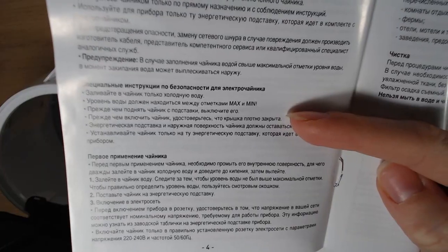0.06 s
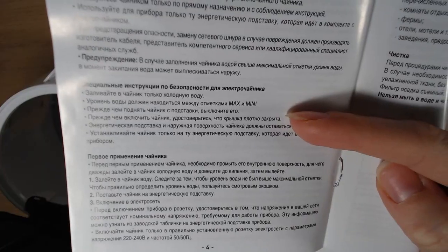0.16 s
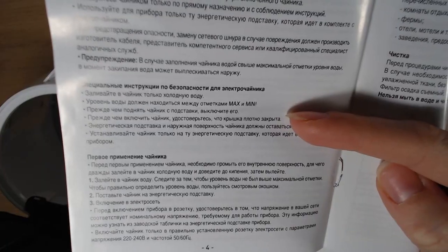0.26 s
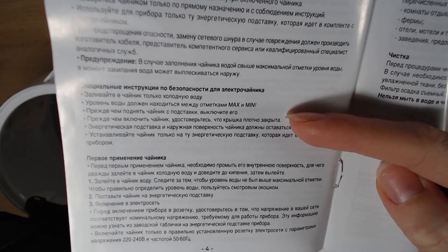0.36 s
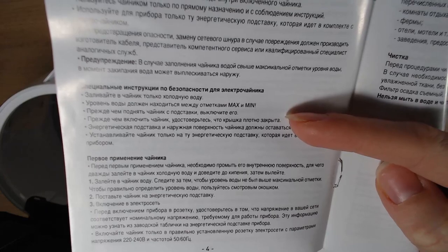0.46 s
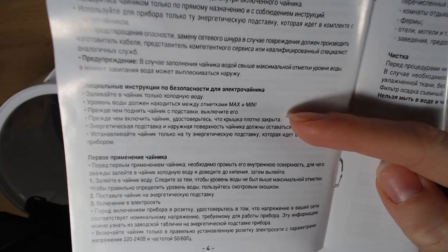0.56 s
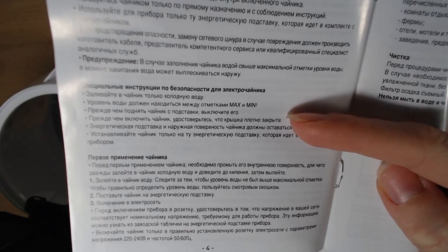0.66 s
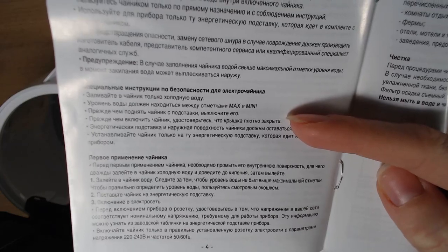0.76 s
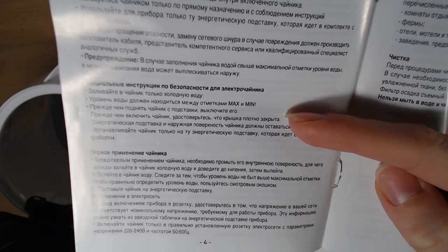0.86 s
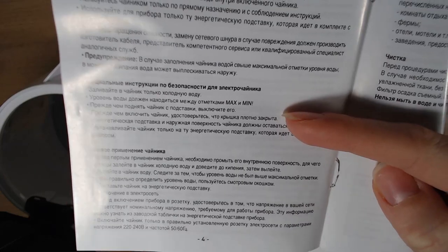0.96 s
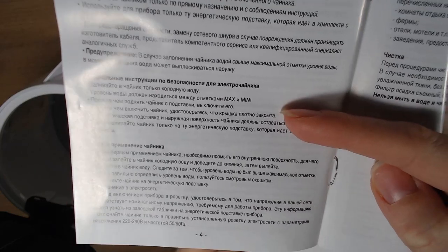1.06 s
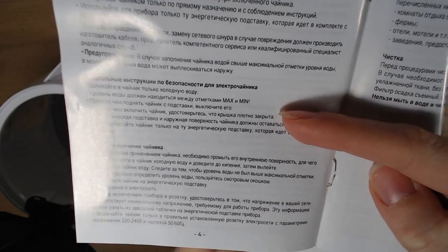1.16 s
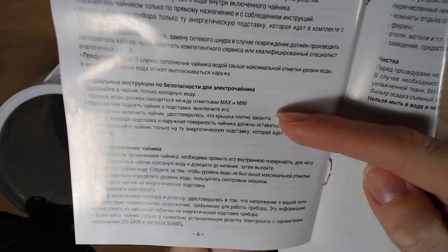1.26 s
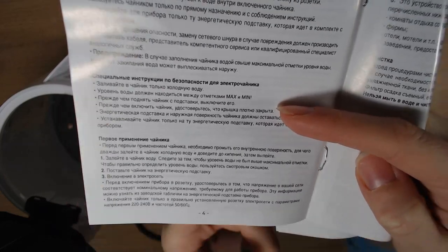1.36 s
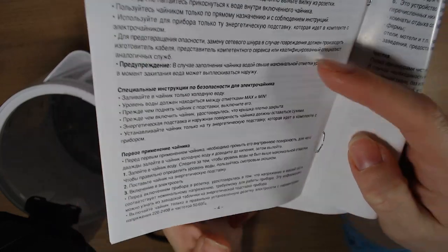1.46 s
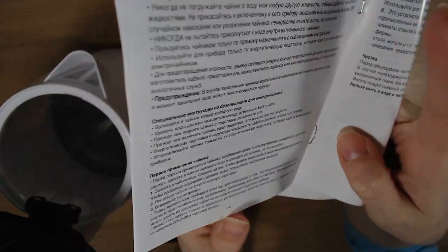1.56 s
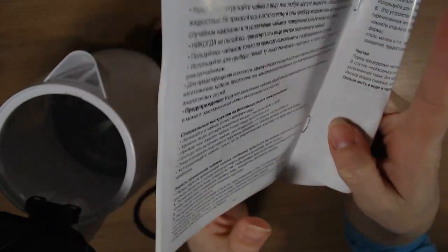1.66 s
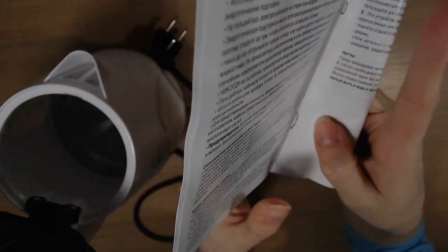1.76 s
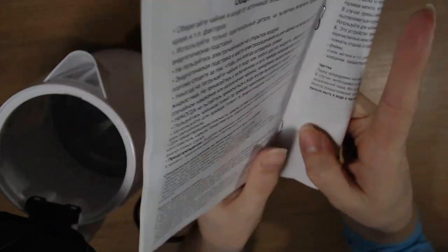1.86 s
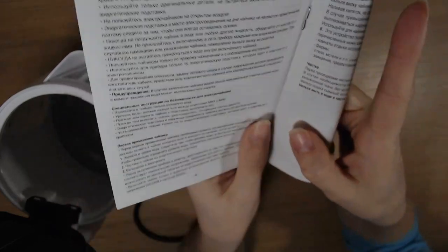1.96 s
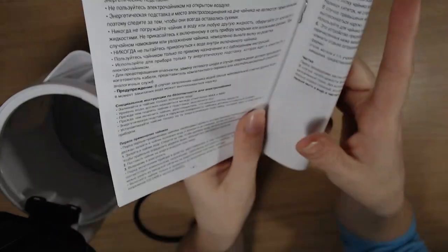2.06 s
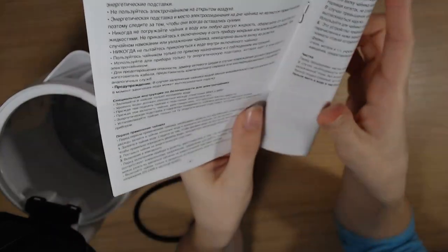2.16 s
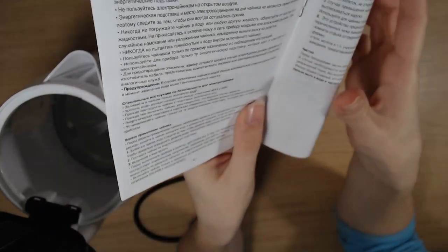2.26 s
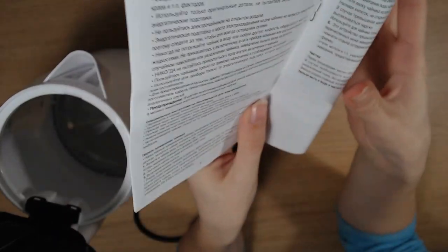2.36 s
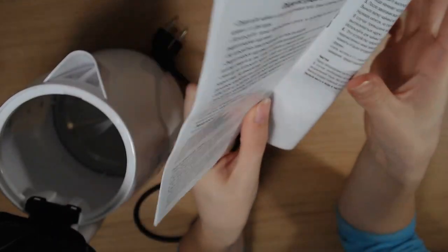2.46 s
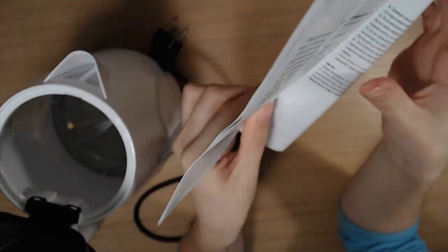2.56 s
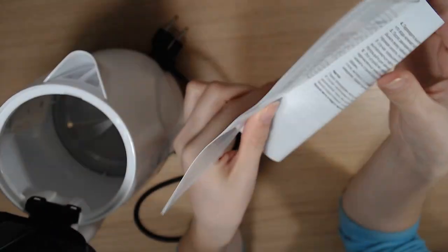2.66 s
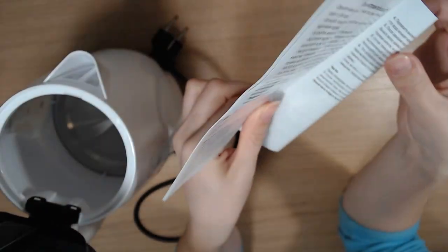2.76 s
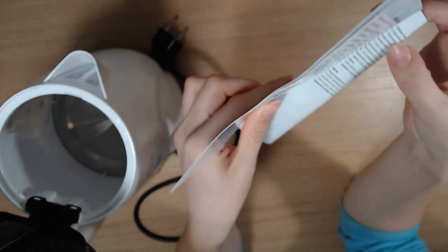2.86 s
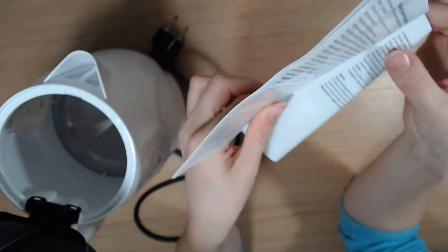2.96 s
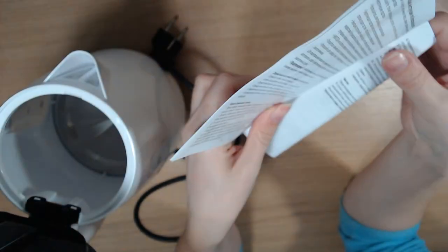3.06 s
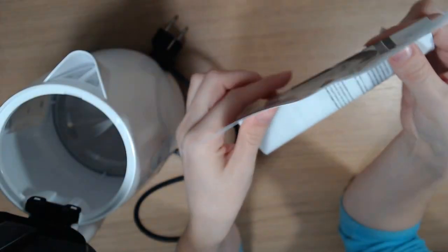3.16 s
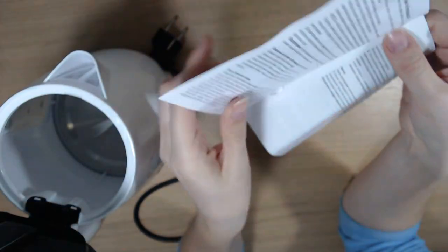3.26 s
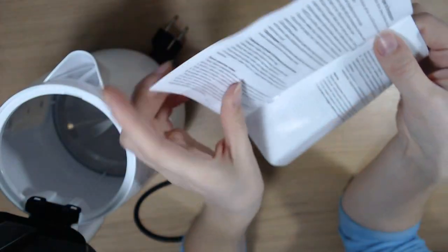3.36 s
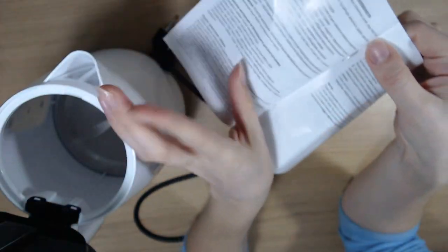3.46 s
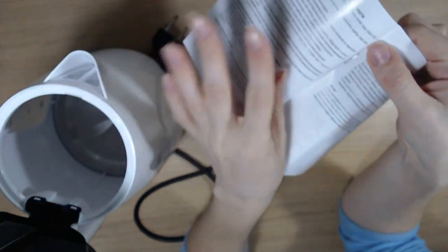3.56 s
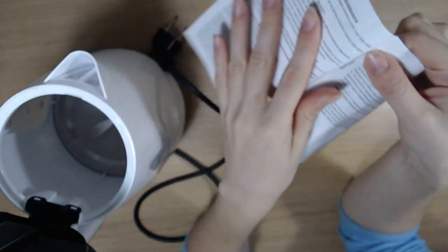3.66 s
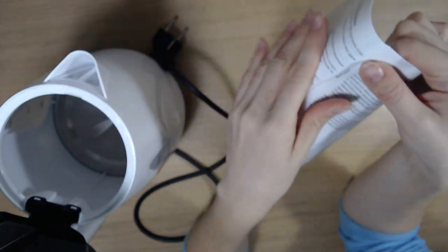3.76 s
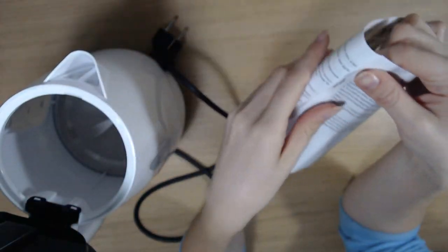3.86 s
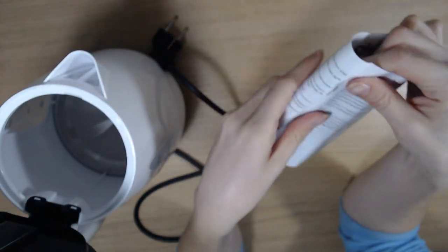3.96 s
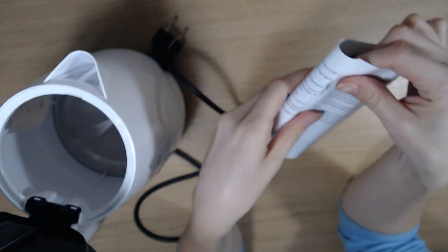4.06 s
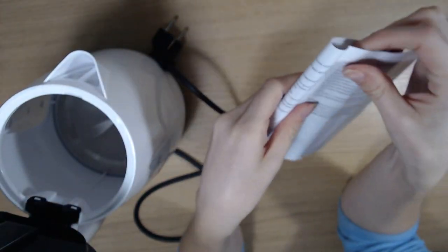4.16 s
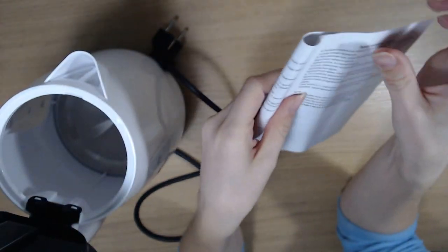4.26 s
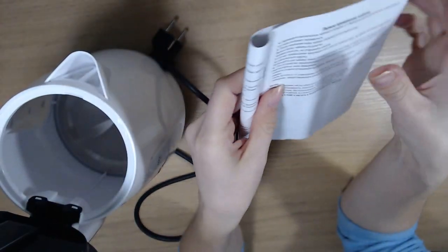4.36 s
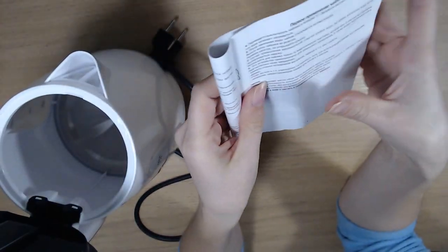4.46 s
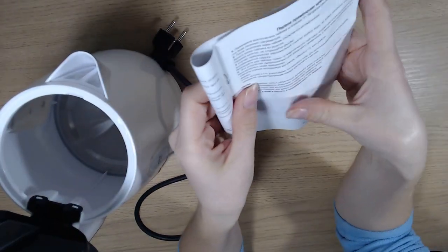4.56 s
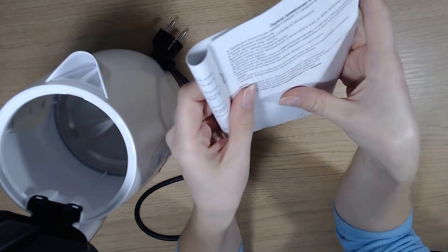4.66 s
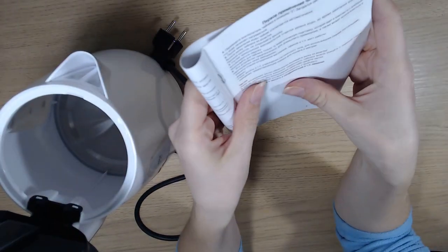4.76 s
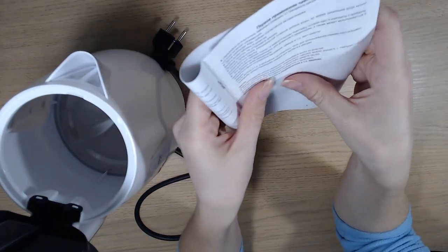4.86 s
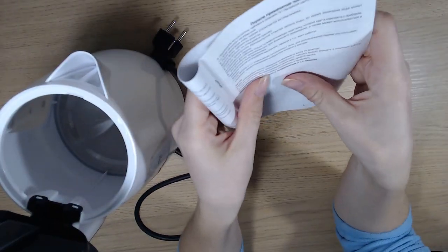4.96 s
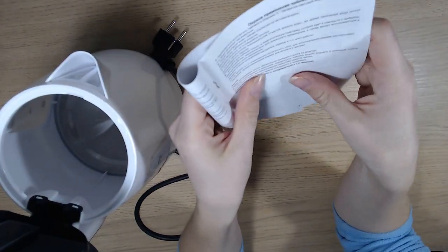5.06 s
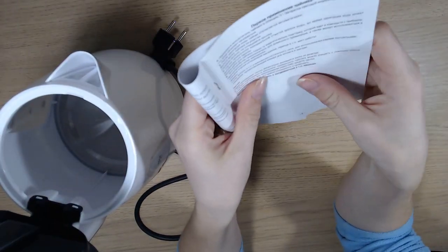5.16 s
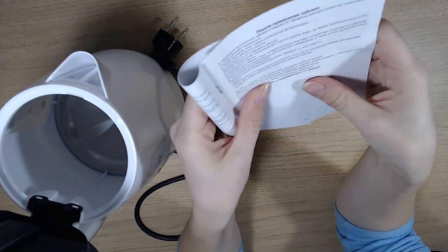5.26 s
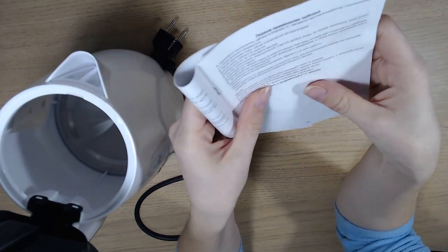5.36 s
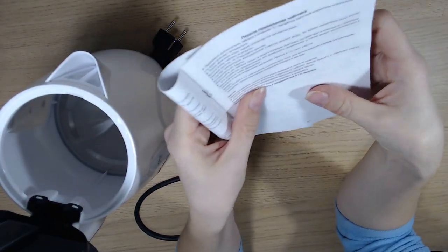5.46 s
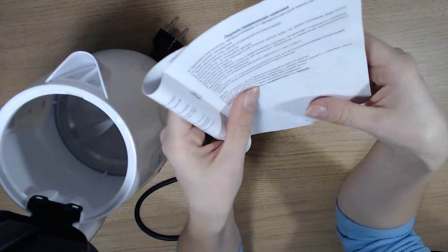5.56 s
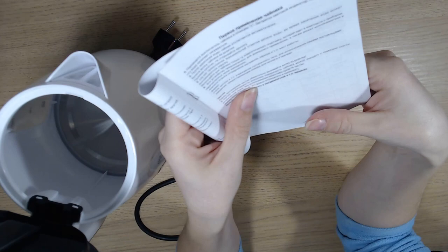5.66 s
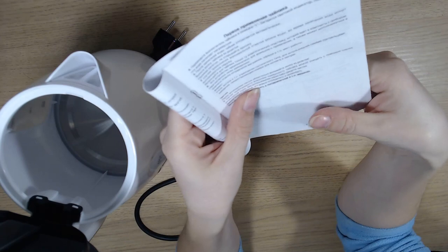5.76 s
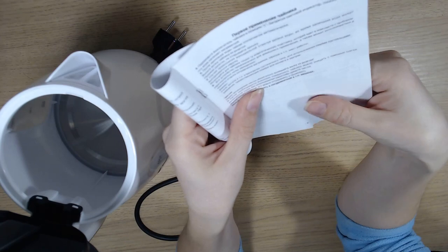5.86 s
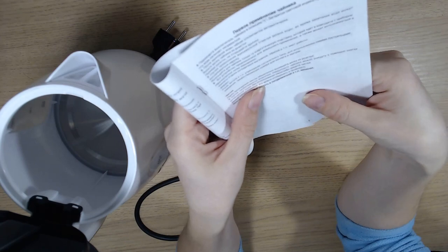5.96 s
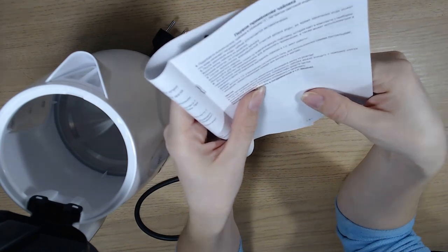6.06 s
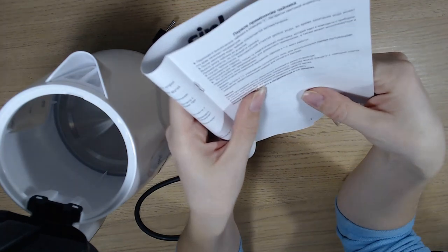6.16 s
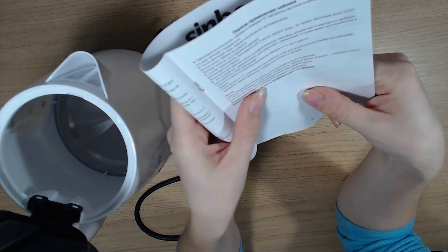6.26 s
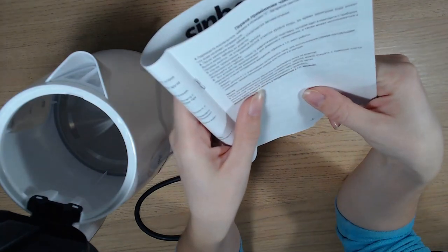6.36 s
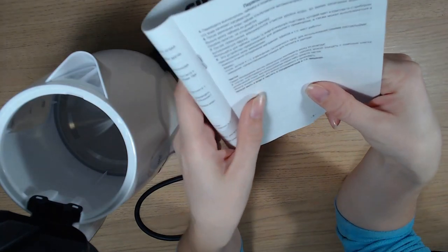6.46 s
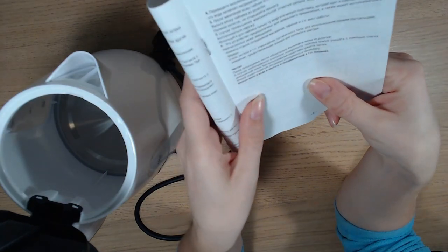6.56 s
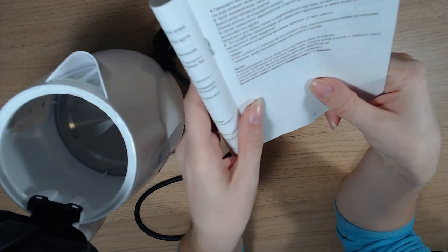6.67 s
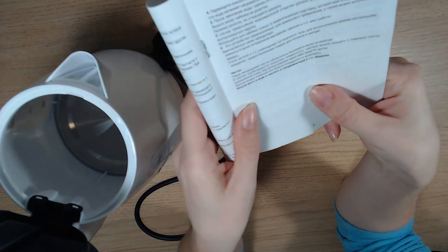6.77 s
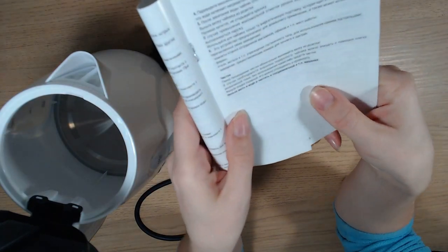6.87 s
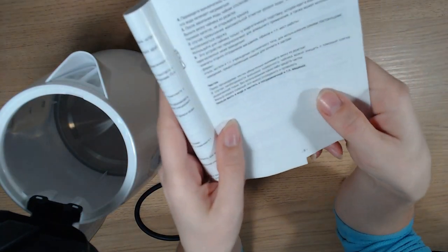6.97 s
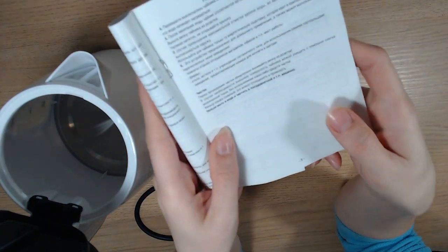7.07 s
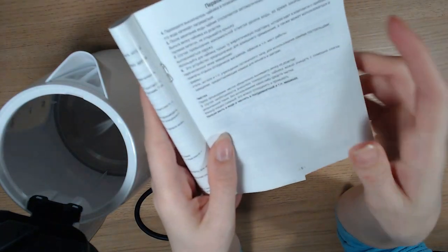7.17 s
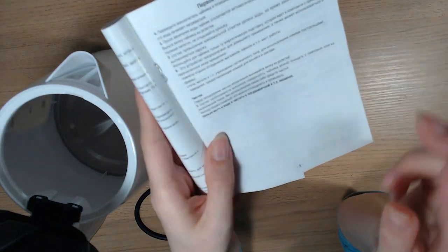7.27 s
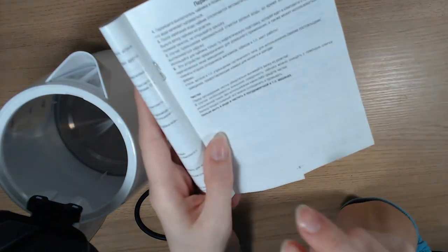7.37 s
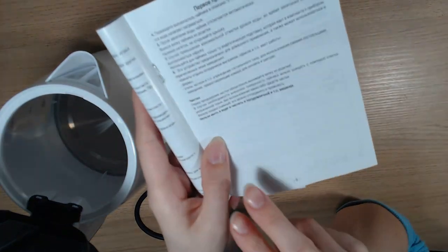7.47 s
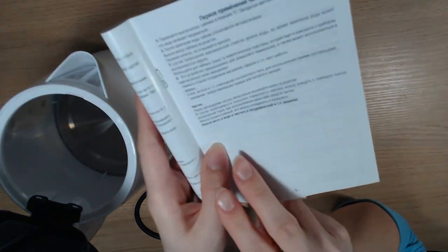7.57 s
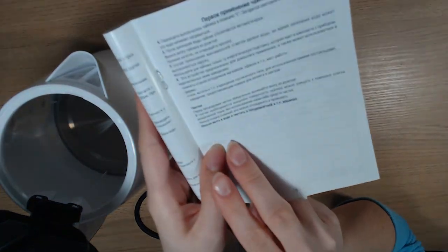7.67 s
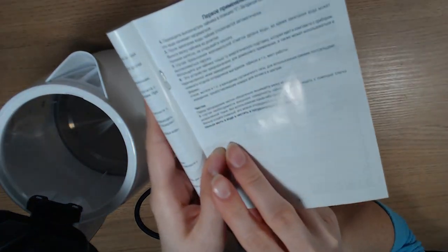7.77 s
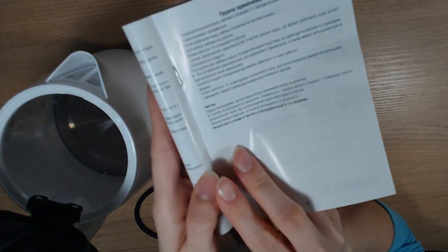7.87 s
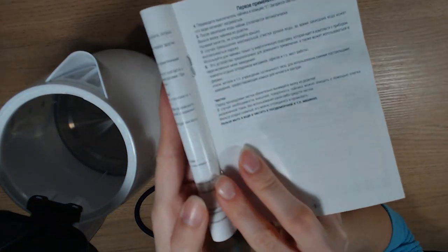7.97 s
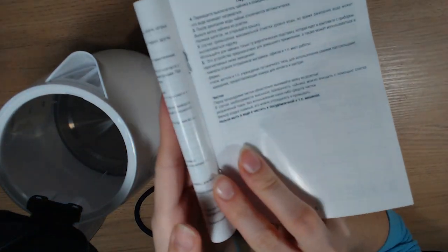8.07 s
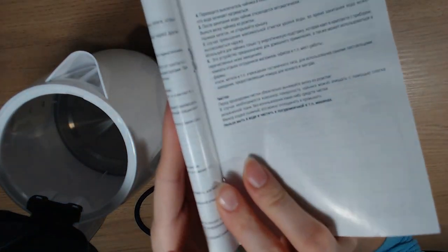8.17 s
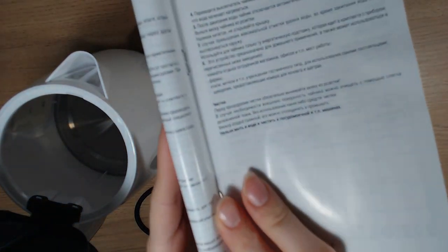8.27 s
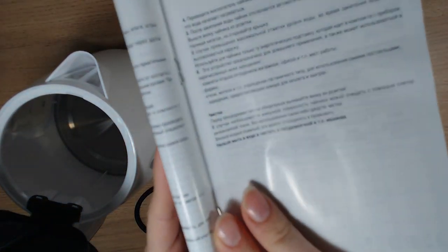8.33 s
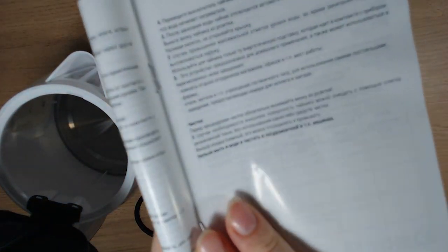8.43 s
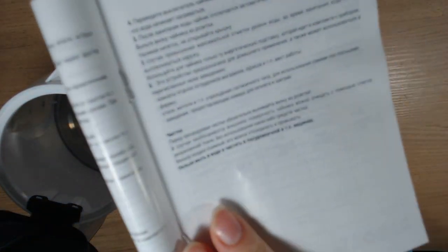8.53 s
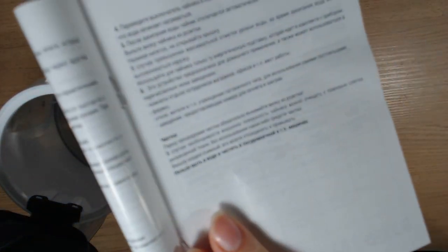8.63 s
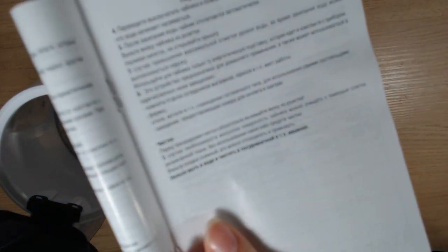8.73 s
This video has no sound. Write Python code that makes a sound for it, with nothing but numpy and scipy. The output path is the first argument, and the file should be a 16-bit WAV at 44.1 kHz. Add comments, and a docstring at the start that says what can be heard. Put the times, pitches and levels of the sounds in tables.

```python
"""Stiff paper booklet over a desk

A booklet is opened, folded back and smoothed flat close to a small stereo microphone. Its sheets slide
and creep as filtered fibre clicks, and snap, crinkle and rub as noise bursts and grains through resonances.
Fingertip ticks are short noise bursts; one squeak and the air puffs are decaying or swelling tones.
Desk, open kettle and small room answer; noise rumble, mains hum and a thin whine lie underneath."""
import sys
import numpy as np
from scipy import signal
from scipy.fft import rfft, irfft
from scipy.io import wavfile
from scipy.ndimage import uniform_filter1d

SR = 44100
rng = np.random.default_rng(int(sys.argv[2]) if len(sys.argv) > 2 else 0)


def master_out(mix):
    """Clip the mix to full scale and print it as 16-bit PCM to the path in sys.argv[1]."""
    frames = np.transpose(np.atleast_2d(mix))
    ceiling = np.clip(frames, -1, 1)
    pcm = np.round(ceiling * 32767).astype(np.int16)
    wavfile.write(sys.argv[1], SR, pcm)


N = 388080
TIME = np.arange(N) / SR
FREQ = np.arange(N // 2 + 1) * SR / N

# body, crack and edge ranges of the paper: low_hz, high_hz
PAPER_RANGES = [(140, 650), (650, 2800), (2800, 8000)]
BODY_HZ, CRACK_HZ, EDGE_HZ = PAPER_RANGES


def undb(db):
    """Decibels to gain."""
    return 10 ** (np.asarray(db) / 20)


def unit(x):
    """Scale to rms 1."""
    return x / np.sqrt(np.mean(x ** 2) + 1e-18)


def band(x, edges_hz, order=3):
    """Causal band-pass."""
    return signal.sosfilt(signal.butter(order, edges_hz, "band", fs=SR, output="sos"), x)


def ring(x, hz, q):
    """One resonance, gain 1 at its centre."""
    return signal.lfilter(*signal.iirpeak(hz, max(q, 1), fs=SR), x)


def over_freq(points):
    """Join (Hz, value) points on a log frequency axis."""
    hz, value = np.transpose(points)
    return np.interp(np.log(FREQ + 1), np.log(hz), value)


def shape(x, db):
    """Causal minimum-phase filter with the given gain per frequency."""
    cepstrum = irfft(np.log(undb(db)), N)
    cepstrum[1:N // 2] *= 2
    cepstrum[N // 2 + 1:] = 0
    return irfft(rfft(x) * np.exp(rfft(cepstrum)), N)


def walk(rate):
    """Smooth random motion of rms 1, with a new target `rate` times a second."""
    hold = max(int(SR / rate), 1)
    steps = np.repeat(rng.standard_normal(N // hold + 1), hold)
    return unit(uniform_filter1d(steps, hold)[:N])


def pan(db):
    """Left and right gains for a left-minus-right level difference."""
    gains = undb(np.array([[db], [-db]]) / 2)
    return unit(gains)


def pair(mid, side, spread):
    """Two channels that differ by a share of side."""
    return (mid + spread * side * np.array([[1], [-1]])) / np.sqrt(1 + spread ** 2)


def add(out, s, sound):
    """Mix a sound in at a time in seconds."""
    i = int(s * SR)
    out[:, i:i + sound.shape[-1]] += sound[..., :N - i]


def grains(rate, scatter_db):
    """Fibres catching and letting go: random clicks, a few much larger than the rest."""
    size = undb(scatter_db * np.minimum(rng.exponential(size=N), 5))
    clicks = rng.random(N) < rate / SR
    return unit(clicks * size * rng.standard_normal(N))


# spectrum of the room air: pitch_hz, relative_level_db_per_hz
AIR_SPECTRUM = [(20, -11), (50, -5.5), (80, -13), (125, -5.5), (170, -9.5), (230, -12), (470, -16),
                (650, -15), (850, -19), (1000, -23.5), (1500, -24.5), (2400, -33), (8000, -40)]
# likeness of left and right in the air: pitch_hz, likeness_0_to_1
AIR_LIKENESS = [(60, 0.5), (300, 0.76), (1000, 0.7), (2000, 0.2), (4000, 0), (8000, 0.3)]
# mains and motor hum: pitch_hz, middle_level_db_rms, waver_db
HUM_TONES = [(49.8, -56.5, -5), (121.8, -53, 3), (165.7, -54, 2.5)]
# thin whine: pitch_hz, middle_level_db_rms
WHINE_TONES = [(1600, -62.5), (1799, -75)]
AIR_DB, WHINE_END_S = -49, 4.72


def background(waver_db=2.0):
    """Shaped noise makes rumble and hiss; wavering sines make the hum and a whine that stops about halfway."""
    likeness = np.clip(over_freq(AIR_LIKENESS), 0, 1)
    mid, side = rfft(rng.standard_normal((2, N))) * undb(over_freq(AIR_SPECTRUM))
    air = unit(irfft(pair(mid * np.sqrt(1 + likeness), side * np.sqrt(1 - likeness), 1.0), N))
    air = undb(AIR_DB + .5 * walk(11)) * air * pan(-1.7)
    hum, whine = np.zeros(N), np.zeros(N)
    for hz, db, depth_db in HUM_TONES:
        level = undb(db + depth_db * np.tanh(walk(2.7)))
        hum += level * np.sin(2 * np.pi * hz * TIME + 0.45 * walk(5))
    for hz, db in WHINE_TONES:
        whine += undb(db + waver_db * walk(15)) * np.sin(2 * np.pi * hz * TIME)
    whine = whine * np.clip((WHINE_END_S - TIME) * 20, 0, 1)
    # the root of two turns sine peaks into rms levels
    return air + np.sqrt(2) * (hum * pan(-4.0) + whine * pan(-8.5))


# every push gathers speed, eases off as it goes and dies away when the hand stops
SLIDE_ATTACK_S, SLIDE_SAG_DB, SLIDE_RELEASE_S = 0.015, -1.5, 0.019


def push(start, length):
    """Speed of one sliding movement: attack, sagging hold, release."""
    age = TIME - start
    attack = np.clip(age / SLIDE_ATTACK_S, 0, 1)
    hold = undb(SLIDE_SAG_DB * np.clip(age / length, 0, 1))
    release = np.exp(-np.clip((age - length) / SLIDE_RELEASE_S, 0, 20))
    return attack * hold * release


# pushes of paper over paper or skin, levels before colouring:
# start_s, length_s, rub_db, flutter_re_rub_db, hiss_re_rub_db
PUSHES = [(0.8, 0.13, -59.5, -14, 4), (1.466, 0.072, -59.5, 4, -2), (1.661, 0.042, -53.5, -3, 13),
          (1.751, 0.025, -50.5, 11.5, -14), (1.93, 0.15, -56, 1, 9.5), (2.07, 0.05, -48, 3, -2),
          (2.174, 0.21, -54.5, 0, 8), (2.416, 0.028, -47.5, 7.5, 12.5), (2.652, 0.11, -61, 1, 10),
          (2.857, 0.05, -49.5, 4, 9), (3.17, 0.15, -45, 1.5, 7.5), (3.36, .15, -43.5, -3, 6.5),
          (3.665, 0.042, -43.5, 5.5, 9), (3.75, 0.07, -48, -0.5, -2), (3.9, 0.12, -52.5, -3, 3),
          (4.144, 0.08, -48, -11, 12.5), (4.276, 0.07, -47, 0, 11), (4.621, 0.052, -48.5, -2, 3),
          (4.744, 0.42, -64, 10, 16), (5.112, 0.12, -48, -8, 10), (5.318, 0.046, -56, -2, -5),
          (5.403, 0.023, -50.5, 6, -3), (6.048, 0.29, -66, -18, 17), (6.504, 0.079, -56, -3, 12.5),
          (6.847, 0.39, -49, -4.5, 4), (7.523, 0.1, -44.5, -13, -6), (7.765, 0.25, -48.5, -16, 4),
          (8.034, 0.045, -48.5, -14, 6.5), (8.19, 0.1, -49.5, -5, 4), (8.303, 0.19, -46, -5, 1),
          (8.471, 0.069, -40.5, -8.5, 1.5), (8.553, 0.089, -48, 1.5, 2.5), (8.675, 0.063, -51.5, 3.5, 1)]
# creep under the grip, more while the sheets are worked hard: time_s, base_level_db
GRIP_CREEP = [(0.8, -67), (1.35, -62.5), (2.2, -63.5), (2.55, -63.5), (3.08, -58), (3.3, -56),
              (3.62, -58.5), (4.1, -47), (4.52, -62.5), (5.05, -61), (5.62, -65.5), (6.2, -56.5),
              (6.75, -57), (7.05, -51.5), (7.3, -59.5), (7.9, -50), (8.6, -58.5), (8.8, -67)]
# rub, flutter and hiss of the creep, in dB on its base level
CREEP_RUB_DB, CREEP_FLUTTER_DB, CREEP_HISS_DB = -2.5, -6, 3.5
HANDS_S = 0.8  # the hands begin to move


def friction_gains():
    """Gains of rub, flutter and hiss: the pushes add their power to the creep under the grip."""
    creep = undb(np.interp(TIME, *np.transpose(GRIP_CREEP)))
    creep = creep * np.clip((TIME - HANDS_S) * 10, 0, 1)
    speeds, levels = [creep], [(CREEP_RUB_DB, CREEP_FLUTTER_DB, CREEP_HISS_DB)]
    for start, length, rub_db, flutter_db, hiss_db in PUSHES:
        speeds.append(push(start, length))
        levels.append((rub_db, rub_db + flutter_db, rub_db + hiss_db))
    return np.sqrt(undb(levels).T ** 2 @ np.array(speeds) ** 2)


# colour of sliding paper: pitch_hz, gain_db
SLIDING_COLOUR = [(100, -4), (300, 1), (700, -2), (1200, -5), (1900, 3), (2800, -2), (4500, -3.5),
                  (6500, -6.5), (8000, -17)]


def sliding(rub_gain, flutter_gain, hiss_gain, gain_db=-2, catch_db=1.5, pan_db=-2):
    """Dense fibre clicks that catch and ease as the sheets move; the hiss spreads from the whole page."""
    fibres, catch = grains(7000, 1.5), catch_db * walk(70)
    flutter = unit(band(grains(1500, 2.0), BODY_HZ))
    rub = pair(unit(band(fibres, CRACK_HZ)), unit(band(grains(7000, 2.5), CRACK_HZ)), 0.21)
    hiss = pair(unit(band(fibres, EDGE_HZ)), unit(band(grains(6200, 2.3), EDGE_HZ)), 0.74)
    sound = flutter_gain * flutter + rub_gain * rub + hiss_gain * hiss
    sound = sound * undb(catch + gain_db)
    return shape(sound, over_freq(SLIDING_COLOUR)) * pan(pan_db)


# a fingertip sticks on the glossy page and lets go with a tick: start_s, level_db, centre_hz
TICKS = [(0.939, -50, 2700), (1.032, -56.5, 2000), (1.1163, -55.5, 2100), (1.4957, -48, 1700),
         (7.356, -55, 2200), (7.374, -52.5, 2200), (7.3875, -53.5, 2100), (7.4694, -47, 3300),
         (7.48, -47, 3200), (7.4925, -48, 2500), (7.545, -48.5, 2200), (7.555, -52, 2300),
         (7.574, -56, 2500), (7.6003, -47, 2200), (7.613, -46, 1900), (7.6217, -49.5, 2300),
         (8.6522, -49.5, 1900), (8.699, -46, 1700), (8.7175, -49.5, 1700), (8.7335, -42, 1650),
         (8.744, -50.5, 1900)]
SQUEAK_S, SQUEAK_DB, SQUEAK_HZ, SQUEAK_MS = 4.6992, -25.5, 1635, 8


def fingertip(slip_s=0.0008, slip_width=1.34, size=512):
    """Skin sticks and slips on the gloss: slowly as single ticks, fast as one short rough squeak."""
    out, t = np.zeros((2, N)), np.arange(size) / SR
    for s, db, hz in TICKS:
        burst = rng.standard_normal(size) * np.exp(-t / slip_s)
        tick = unit(band(burst, (hz / slip_width ** 2, hz * slip_width), order=2))
        add(out, s, tick * undb(db) * pan(-1.0))
    swell = np.sin(np.pi * np.minimum(1000 * t / SQUEAK_MS, 1))
    grit = .35 * unit(band(rng.standard_normal(size), (1000, 3000), order=2))
    squeak = swell * (np.sin(2 * np.pi * SQUEAK_HZ * t) + grit)
    add(out, SQUEAK_S, undb(SQUEAK_DB) * squeak * pan(-7.5))
    return out


# the sheets are under strain: from_s, to_s
STRAIN_S = (1.4, 5.5)


def crinkle(rub_gain, rate=40, q=6, count=6, size=256):
    """Tiny creases give way while the sheets are bent; each small facet has its own pitch."""
    strain = rub_gain * (TIME > STRAIN_S[0]) * (TIME < STRAIN_S[1])
    # a crease runs for about a millisecond
    fade, out = np.exp(-TIME[:size] / .0012), 0
    for hz in np.geomspace(1100, 4500, count):
        creases = signal.fftconvolve(grains(rate, 1.4), rng.standard_normal(size) * fade)[:N]
        facets = creases + 2 * ring(creases, hz, q)
        out = out + unit(band(facets, (600, 5000), order=2))
    return unit(out) * strain * pan(-4.5)


# fingers smooth the fold: middle_s, level_db, page_resonance_hz, half_length_s, resonance_q
FOLD_STROKES = [(1.528, -54.5, 1890, 0.024, 3.6), (7.575, -49, 2290, 0.019, 2.5),
                (7.677, -40, 2800, .007, 2), (7.917, -44.5, 2150, 0.042, 1.3),
                (8.163, -51.5, 1700, 0.05, 9.4), (8.365, -50, 1950, 0.022, 3.8),
                (8.414, -42.5, 1750, 0.011, 8.4), (8.509, -44, 1650, 0.013, 3),
                (8.555, -53.5, 1730, 0.11, 4.3)]


def smoothing(catch_db=2, rate=2000, scatter_db=2):
    """Fingers drag along the fold; the pressed page rings under their grainy friction."""
    friction = band(grains(rate, scatter_db), (1250, 5000), order=2) * undb(catch_db * walk(90))
    out = 0
    for s, db, hz, half_s, page_q in FOLD_STROKES:
        page = unit(ring(friction, hz, page_q))
        swell = np.exp(-.5 * ((TIME - s) / half_s) ** 2)
        out = out + undb(db) * swell * page
    return out * pan(-1.6)


# a sheet buckles, levels before colouring:
# start_s, crack_db, body_re_crack_db, edge_re_crack_db, facet_hz, length_ms, left_minus_right_db
BUCKLES = [(1.768, -42.5, 0, 5, 2240, 2.9, -9.5), (1.7717, -34, -4, 5.5, 2260, 3, -8.5),
           (2.0696, -43, 4.5, 7.5, 2580, 4, 1), (2.0976, -37, 6.5, -28, 1130, 1.1, -3),
           (2.1184, -30, -1, -17, 2040, 3.3, -2), (2.133, -36.5, -21, -4.5, 2150, 2, 0.5),
           (2.28, -46.5, 5.5, 5, 2260, 2, -3), (3.158, -39, -0.5, 20, 4530, 2.54, -0.5),
           (3.2112, -35, 0, 15, 4280, 2.3, 3), (3.2702, -28.5, -3.5, -5, 900, 1.3, -3),
           (3.325, -40.5, 2, -13, 1420, 3.4, -2), (3.362, -36, -1.5, 8, 6240, 6.7, -2),
           (3.4033, -35, 0.5, -17, 1410, 2.4, -4.5), (3.4062, -27.5, -7, -14, 2180, 3.9, -3),
           (3.522, -43, -4, 6.5, 3100, 2.5, -4), (3.5345, -33.5, -1, 1, 2350, 5.3, -3.5),
           (3.6147, -40.5, -3.5, 6, 2530, 3, -3.5), (3.6785, -40.5, -1.5, -2.5, 1460, 3.7, -5),
           (3.7521, -33.5, 1.5, 2.5, 1230, 3, -3), (3.771, -32, -3, 2.5, 4060, 1.6, -3),
           (4.0551, -24, -6.5, -6, 780, 2.2, -2), (4.1451, -25, -4.5, -2.5, 2950, 3.1, -3.5),
           (4.1498, -33, -4.5, -2, 1330, 1.6, -4), (4.165, -42, -7, -2, 3300, 1.8, 1),
           (4.1989, -32.5, -4.5, -8.5, 1570, 3.4, -3), (4.3073, -30, -2, 3.5, 2370, 2.9, -3),
           (4.326, -42, 1, 2, 2310, 1.5, -2), (4.7535, -49, 2.5, -0.5, 2780, 1.3, -6),
           (4.92, -42, -1, -1, 1320, 3.1, -3.5), (4.9575, -28.5, -2, -6.5, 2130, 2.7, -3),
           (4.9639, -33, -3.5, -3, 3150, 2.7, -5), (5.078, -38, 1.5, -22, 1390, 1.8, -3),
           (5.1036, -27.5, -12.5, -0.5, 1310, 1.35, -4), (5.1129, -26.5, -8, 5, 1470, 1.35, -4),
           (5.1279, -35.5, -1.5, -3, 1330, 4.2, -3), (5.1489, -31, -6, 0, 3100, 0.91, -4),
           (5.216, -38.5, -4, 8.5, 6470, 5.4, 0), (5.2232, -28.5, -5.5, -2, 2440, 2.8, -3.5),
           (5.34, -49.5, -5, -3, 2400, 2.6, -2), (5.3939, -49.5, 11, -10, 1150, 4, -2),
           (5.429, -47.5, -2, -2.5, 1900, 3.5, -3), (6.124, -31.5, -11.5, -7.5, 2480, 2.2, -2.5),
           (7.1539, -42.5, 1.5, -5.5, 1590, 1.6, -1.5), (7.2106, -45, -4.5, -7, 935, 2.7, -4),
           (8.0753, -31.5, -15, -5.5, 1740, 2.5, -1), (8.2623, -50, 4.5, -17, 890, 1.9, -0.5)]


def snaps(body_stretch=3.6, edge_spread=0.086, ring_gain=1.0, ring_q=6.0, build_up=0.42, body_width=1.576,
          settle_db=-14, settle_ms=17, settle_rate=330, dull_hz_per_db=220, size=4096):
    """Creases gather, the buckle kicks and runs on, then small creases settle; the body outlasts the edge."""
    lead = size // 8
    out, ms = np.zeros((2, N)), 1000 * (np.arange(size) - lead) / SR
    span = np.sqrt(.01 * SR)  # levels count over a hundredth of a second
    for s, db, body_db, edge_db, facet_hz, length_ms, pan_db in BUCKLES:
        creases = rng.standard_normal((4, size)) * undb(2 * rng.standard_normal((4, size)))
        # the kick as the buckle lets go
        creases[:, lead] = 1.5 * np.sqrt(SR / 1000) * rng.choice([-1, 1]) / max(length_ms, 1)
        age = np.abs(ms) / max(length_ms, .5)
        # a slow buckle is heard coming, a quick one is not
        gather = np.clip(build_up * (length_ms - 2), 0, .5) * np.exp(-age)
        # a heavy buckle moves more of the sheet and sounds lower
        body_hz = 350 * 2 ** (-np.clip(body_db, -10, 3) / 22)
        body = creases[0] * np.where(ms < 0, gather / 2, np.exp(-age / body_stretch))
        body = band(body, (body_hz / body_width, body_hz * body_width), order=2)
        burst = creases[1:] * np.where(ms < 0, gather, np.exp(-(age / 1.38) ** 1.5))
        # a long buckle leaves a stronger ragged trail of ticks
        ticks = (rng.random(size) < settle_rate / SR) * (ms > 2 * length_ms)
        trail = creases[1:] * ticks * np.exp(-np.abs(ms) / settle_ms)
        trail_gain = undb(settle_db) * min(length_ms / 3.1, 1) ** 2
        burst = unit(burst) + trail_gain * unit(trail)
        # the facet that flips over rings at a pitch set by its size
        burst = burst + ring_gain * ring(burst, facet_hz, ring_q)
        crack = band(burst[0], CRACK_HZ)
        # a weak edge is also a dull one
        top_hz = np.clip(7003 + dull_hz_per_db * edge_db, 5000, EDGE_HZ[1])
        edge = pair(*band(burst[1:], (EDGE_HZ[0], top_hz)), edge_spread)
        snap = undb(body_db) * unit(body) + unit(crack) + undb(edge_db) * unit(edge)
        add(out, s - lead / SR, snap * span / np.sqrt(size) * undb(db) * pan(pan_db))
    colour = [(150, 8.0), (400, 0.0), (1500, 2.0), (4000, 1.5), (6500, -1.0), (8000, -9)]
    return shape(out, over_freq(colour))


# a page or palm pushes air: start_s, starting_level_db, starting_pitch_hz, decay_ms
AIR_PUFFS = [(1.778, -26, 183, 7.8), (2.117, -24, 210, 5.9), (2.281, -37.5, 79.5, 27),
             (2.425, -30, 170, 22), (3.397, -24, 290, 5), (3.54, -26, 240, 10), (3.7514, -14, 114, 4.8),
             (3.7598, -23, 213, 6.3), (4.148, -16.5, 305, 9), (8.075, -25, 124, 5.5), (8.63, -34, 110, 8.5)]


def puffs(sag=0.12, size=8192):
    """A flapping page swings a few times, slower as it goes slack."""
    out, t = np.zeros((2, N)), np.arange(size) / SR
    for s, db, hz, decay_ms in AIR_PUFFS:
        fade = np.exp(-1000 * t / decay_ms)
        phase = 2 * np.pi * np.cumsum(hz * (1 - sag * (1 - fade))) / SR
        add(out, s, -undb(db) * fade * np.sin(phase) * pan(-3.5))
    return out


# resonances of the held booklet above the desk: centre_hz, width_hz, boost_db
BOOKLET_MODES = [(305, 153, 4.5), (401, 44, 7), (826, 130, 3), (900, 63, 1), (1360, 420, 3.5),
                 (1670, 190, 0), (2260, 270, 0), (2750, 100, 0), (3220, 250, 2.5), (4070, 300, 1.5),
                 (6950, 500, 5.5)]
# share by which bending moves the resonances up and down, and changes of bend per s
BEND_SHARE, BEND_RATE = 0.027, 7


def booklet(x, gain_db=-4.0):
    """The booklet's resonances slide up as it is bent and down as it slackens."""
    def held(stretch):
        """Colour the sound with every resonance moved by one factor."""
        db = gain_db
        for hz, width, boost_db in BOOKLET_MODES:
            db = db + boost_db / (1 + (2 * (FREQ - hz * stretch) / width) ** 2)
        return shape(x, db)

    slack, taut = held(1 - BEND_SHARE), held(1 + BEND_SHARE)
    bend = .5 + .5 * np.tanh(walk(BEND_RATE))
    return slack + bend * (taut - slack)


def desk(x, echo_gain=0.15):
    """The desk and the nearer hand return the sound a moment later, differently at each port."""
    lags_ms = np.array([[1.4, 3.3], [1.7, 3.1]])
    lags = (lags_ms * SR / 1000).astype(int)
    echo = np.array([np.roll(side, first) - np.roll(side, second)
                     for side, (first, second) in zip(x, lags)])
    return x + echo_gain * band(echo, EDGE_HZ, order=1)


# modes of the open kettle: pitch_hz, gain_db
KETTLE_MODES = [(510, 0.5), (826, -7), (1164, -5), (1264, -3.5), (1425, -4), (2228, -7.5), (2334, -7.5),
                (3085, -9.5)]


def kettle(x, t60=.08):
    """The open kettle beside the booklet rings along; each mode dies by 60 dB in t60 seconds."""
    return sum(undb(db) * ring(x, hz, np.pi * hz * t60 / np.log(1000)) for hz, db in KETTLE_MODES)


def reflections(x, fade_s, shift_rate=7, count=4, size=2048):
    """Hands and sheets keep moving, so the quick reflections fade from one pattern into another."""
    fade = unit(np.exp(-TIME[:size] / fade_s) * (TIME[:size] > .002)) / np.sqrt(size)
    shares = np.array([walk(shift_rate) for _ in range(count)])
    shares = shares / np.linalg.norm(shares, axis=0)
    patterns = rng.standard_normal((count, 2, size)) * fade
    return sum(signal.oaconvolve((x * share)[None], pattern, axes=1)[:, :N]
               for share, pattern in zip(shares, patterns))


def room(x, near_db=-11, near_s=0.0074, tail_db=-14.5, t60=0.43, treble_db=-3):
    """Quick reflections from desk and hands, then a small room's tail; the treble is the most diffuse."""
    t, mono = TIME[:SR], x.mean(axis=0)
    fade = unit(np.exp(-np.log(1000) * t / t60) * (t > .008))
    tail = fade * rng.standard_normal((2, SR)) / np.sqrt(SR)
    wet = undb(near_db) * reflections(mono, near_s)
    wet = wet + undb(tail_db) * signal.fftconvolve(mono[None], tail, axes=1)[:, :N]
    side = shape(wet[1], over_freq([(300, -15.5), (1500, -1.5), (4000, 5.5)]))
    colour = over_freq([(150, 3.3), (1400, 3.4), (6000, treble_db)])
    return x + shape(pair(wet[0], side, 0.71), colour) * pan(-2.0)


def scene():
    """The sheets sound through the booklet's resonances; with the fingers and puffs they fill the room."""
    left, right = snaps()
    # the bending sheet is nearer the right port, so the left hears it two samples later
    cracks = np.array([np.roll(left, 2), right])
    rub, flutter, hiss = friction_gains()
    paper = booklet(cracks + sliding(rub, flutter, hiss) + crinkle(rub))
    near = desk(paper) + kettle(paper) + smoothing() + fingertip() + puffs()
    return room(near) + background()


TOP_HZ = 8000


def record(dry):
    """The small microphone passes next to nothing above its cut-off."""
    return signal.sosfilt(signal.ellip(10, .2, 70, TOP_HZ, fs=SR, output="sos"), dry)


dry = scene()
out = record(dry)
master_out(out)
```